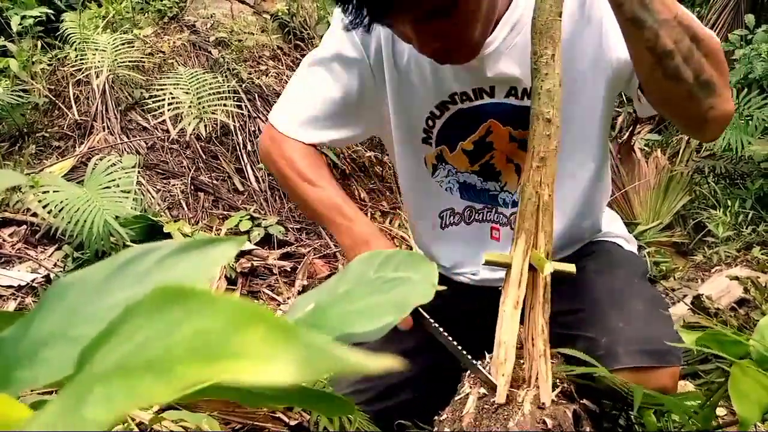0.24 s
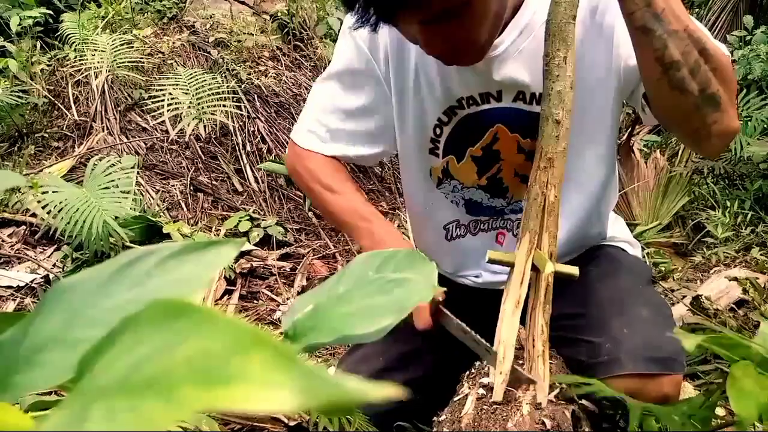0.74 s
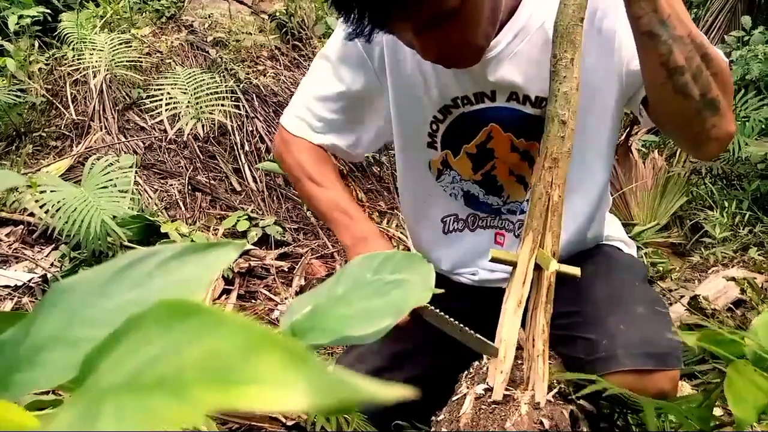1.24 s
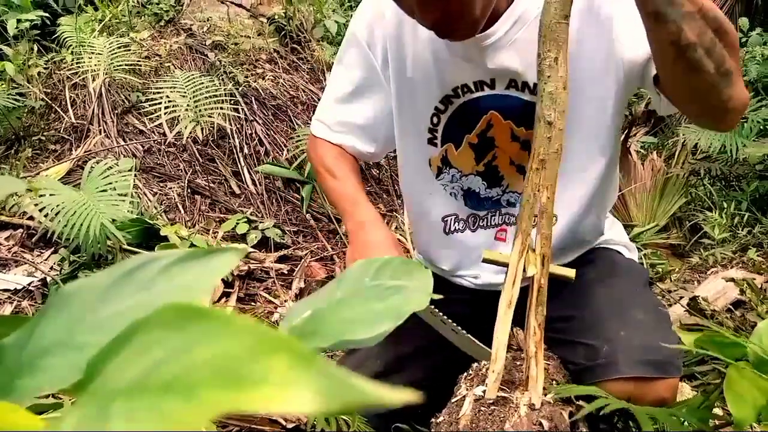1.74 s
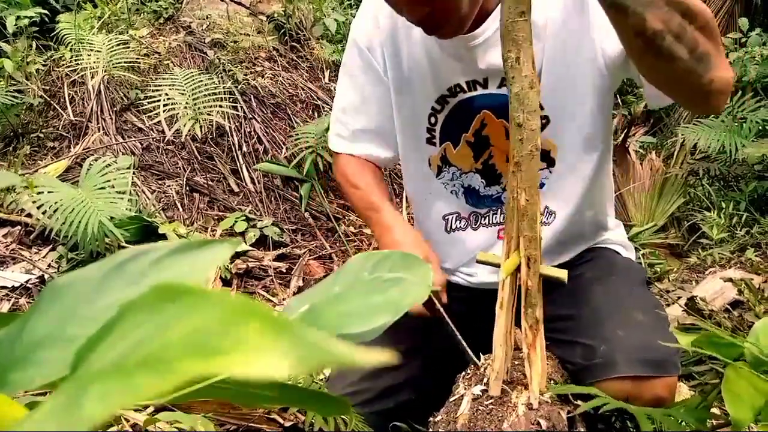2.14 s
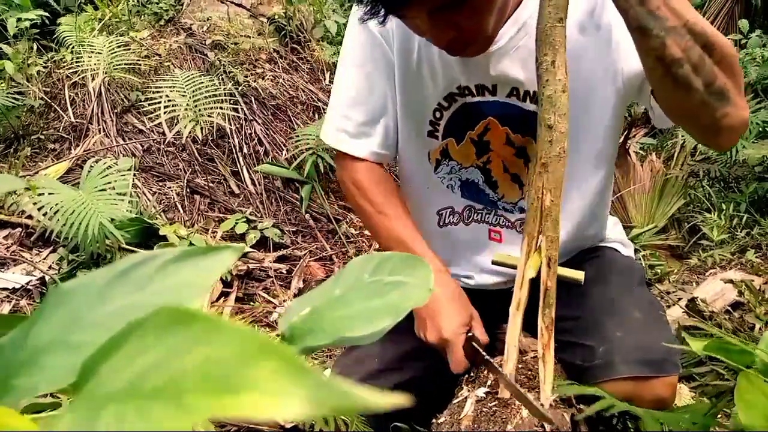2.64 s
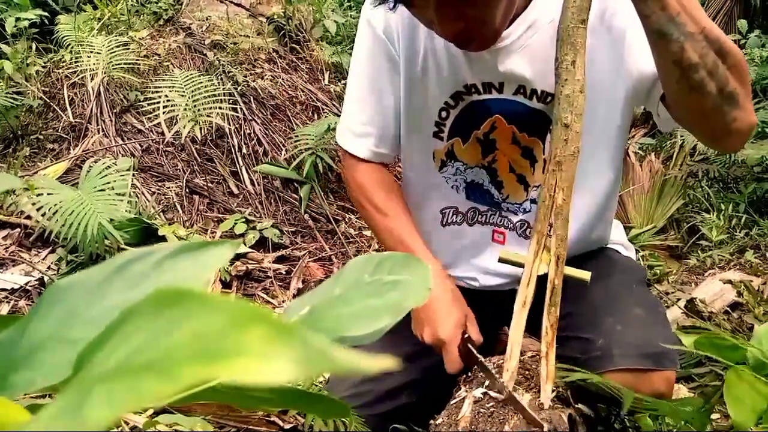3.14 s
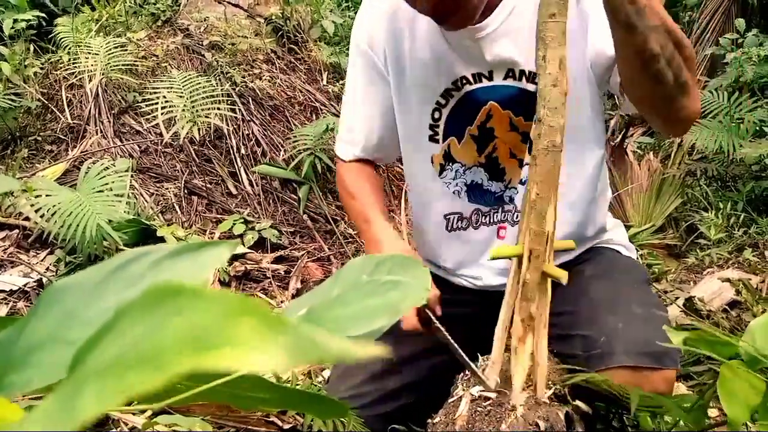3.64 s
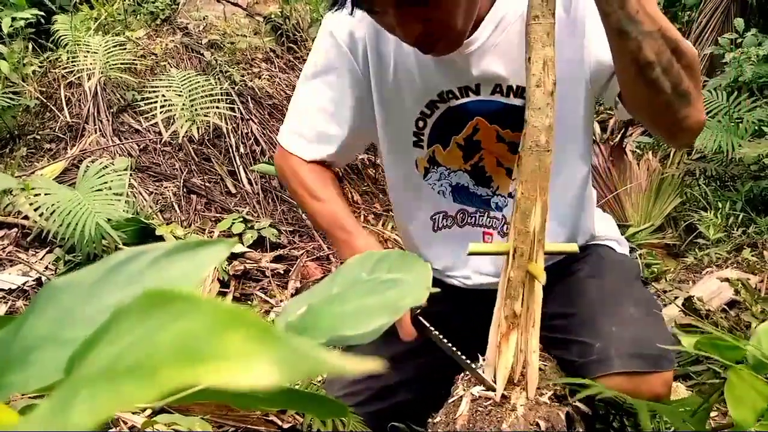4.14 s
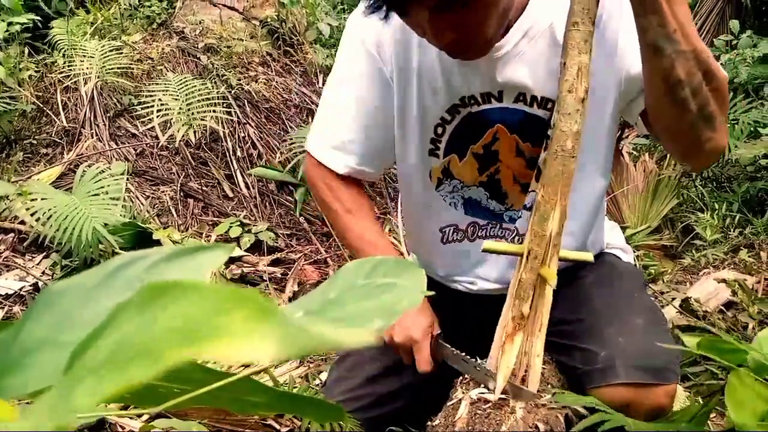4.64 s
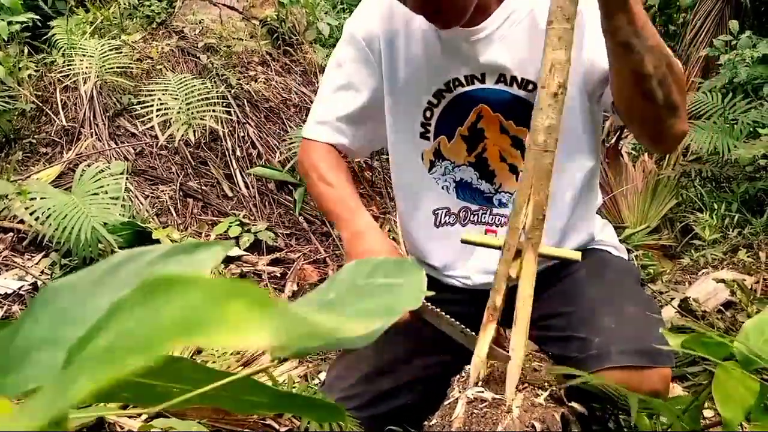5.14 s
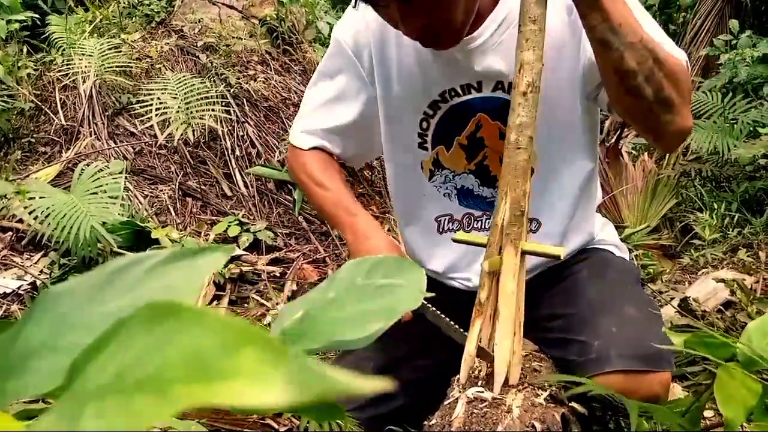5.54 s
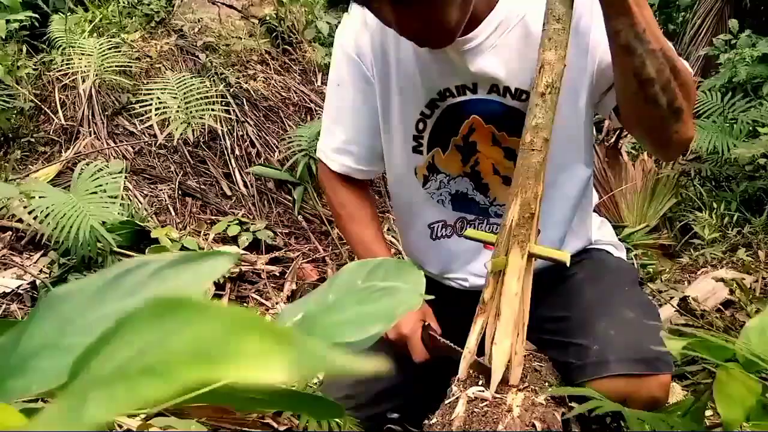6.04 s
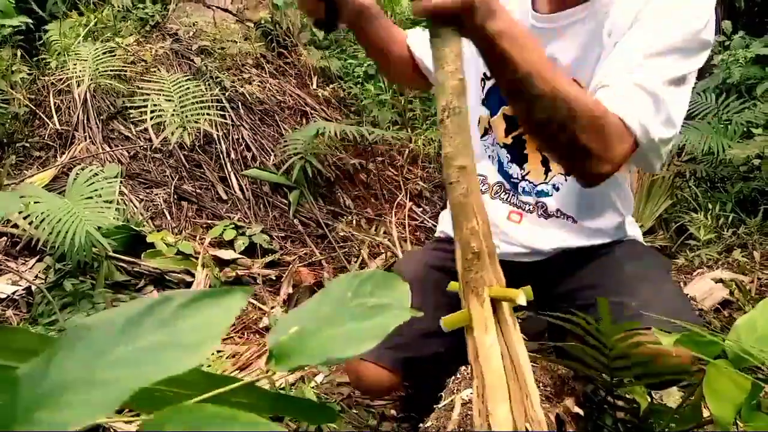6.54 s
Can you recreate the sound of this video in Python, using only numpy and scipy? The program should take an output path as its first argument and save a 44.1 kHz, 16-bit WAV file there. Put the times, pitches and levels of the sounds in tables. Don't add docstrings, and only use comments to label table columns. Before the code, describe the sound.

A close, dry mono outdoor scene with a very quiet bed: the faint bright hiss and dull wash of a distant stream, and a fuzzy low hum that swells and fades. A knife splits and whittles bamboo. A small hollow knock at 0.2 s leads to a crisp snap at 0.6, then a sharper crack with a high steel ring at 0.95. A hard double-edged crack with hollow pole knock comes at 1.35, a very bright dry snap at 1.93, a grazing cluster at 2.75 and a ringing crack with sliding steel at 3.15. From 3.5 to 4.6 only light ticks, gritty scrapes and litter rustle. Strong woody cracks return at 5.07 and, with blade ring, at 5.85. Small ticks and brushing follow near 6.35, while a low, lumpy wind gust buffets the microphone until about 6.8, with one last faint crack at 6.75.

```python
import sys
import numpy as np
from scipy import signal
from scipy.fft import rfft, irfft
from scipy.io import wavfile
from scipy.ndimage import uniform_filter1d

SR = 44100
rng = np.random.default_rng(int(sys.argv[2]) if len(sys.argv) > 2 else 0)


def natural_amplitude(level_db):
    exponent = np.asarray(level_db, float) / 20
    return 10 ** exponent


def generate_wav(sig):
    pcm = np.round(np.clip(np.atleast_2d(sig).T, -1, 1) * 32767).astype(np.int16)
    wavfile.write(sys.argv[1], SR, pcm)


N = 299439
TOP_HZ = 15650


def evened(x):
    return x / np.sqrt(np.mean(x ** 2) + 1e-20)


def curve(rows, rest_db):
    t = np.arange(0, N + 64, 64) / SR
    power = natural_amplitude(2 * rest_db) + 0 * t
    for peak_s, db, *lengths in rows:
        length = np.where(t < peak_s, lengths[0], lengths[-1])
        power = power + natural_amplitude(2 * (db - 10 * abs(t - peak_s) / length))
    return np.interp(np.arange(N) / SR, t, np.sqrt(power))


def read(points, hz):
    f, value = np.transpose(points)
    return np.interp(np.log(hz + 1), np.log(f + 1), value)


def add(mix, s, sound):
    part = mix[round(s * SR):][:len(sound)]
    part += sound[:len(part)]


def colour(x, db_of_hz):
    return irfft(rfft(x) * natural_amplitude(db_of_hz(np.fft.rfftfreq(len(x), 1 / SR))), len(x))


def band(x, lo_hz, hi_hz):
    return signal.sosfilt(signal.butter(2, [lo_hz, hi_hz], "bandpass", fs=SR, output="sos"), x)


def two_click_streams():
    noise = rng.standard_normal((2, N))
    strength = natural_amplitude(1.7 * rng.exponential(1, (2, N)))
    return noise * strength * (rng.random((2, N)) < .4)


# frequency in Hz, level in dB.
STREAM_HISS = [(710, -29), (1200, -4), (1410, -2), (1640, -3), (1880, -3), (2770, -4.5), (2980, -3.5),
               (3280, -4.5), (6510, -6), (8070, -13), (9990, -7.5), (13200, -26), (14900, -15),
               (15500, -14.5)]
# frequency in Hz, level in dB.
LOW_WASH = [(15, -63), (25, -30), (75, -15), (108, -18), (162, -6.5), (195, -2), (251, -4), (278, -7),
            (554, -11), (1400, -10.5), (1820, -44), (3080, -120)]


def stream():
    hiss = colour(rng.standard_normal(N),
                  lambda hz: read(STREAM_HISS, hz) - 80 * (hz > TOP_HZ) - 80 * (hz < 1300))
    wash = colour(rng.standard_normal(N), lambda hz: read(LOW_WASH, hz) - 80 * (hz >= 1300))
    water = natural_amplitude(-59.5) * evened(hiss) + natural_amplitude(-62.5) * evened(wash)
    z = signal.stft(water, nperseg=1024, noverlap=768)[2]
    patches = uniform_filter1d(rng.standard_normal(z.shape), size=8, axis=0)
    patches = uniform_filter1d(patches, size=12, axis=1)
    return signal.istft(z * natural_amplitude(1.7 * evened(patches)), nperseg=1024, noverlap=768)[1][:N]


# peak in seconds, level in dB, build-up in seconds, release in seconds.
SCRAPE_STROKES = [(.05, -66, .1, .06), (.62, -55, .045, .035), (1.2, -66, .25, .1), (1.4, -63, .12, 0.11),
                  (1.9, -68, .3, .1), (2.72, -57, .06, 0.085), (3.15, -58.5, 0.19, .12),
                  (3.6, -62.5, 0.157, .03), (4.12, -61, .05, .08), (4.53, -58.5, 0.096, .05),
                  (4.575, -54, 0.028, 0.027), (5.07, -60.5, 0.24, 0.127), (5.33, -62.5, .2, 0.54),
                  (5.84, -57, 0.12, .07), (6.02, -61, .12, 0.21), (6.37, -61.5, 0.11, .12),
                  (6.6, -63.5, .3, 0.44)]


def scrape(clicks):
    def shade(hz):
        return read(STREAM_HISS, hz) + 3.9 * np.log2(hz / 5000 + .05) - 80 * (hz > TOP_HZ)
    return curve(SCRAPE_STROKES, -73) * evened(colour(clicks, shade))


# frequency in Hz, level in dB, T60 in seconds.
HOLLOW_JOINTS = [(289, 5.2, 0.034), (422, 2.7, 0.033), (610, -10, 0.024), (850, 2, 0.031),
                 (1080, 2.8, 0.021), (1464, -1, 0.03), (2106, 0.5, 0.013), (2337, -4.5, 0.041),
                 (3590, -3.5, 0.037), (4110, -7, 0.026), (4930, -32, 0.016), (6320, -1, .022)]
# start in seconds, level in dB, centre in Hz, reach in octaves.
POLE_KNOCKS = [(.196, -50, 270, .3), (.620, -49.5, 420, .3), (.9442, -42.5, 520, 0.68),
               (0.9448, -45, 2600, 0.7), (1.338, -38.5, 380, 0.3), (1.3389, -38.5, 1050, 1.33),
               (1.9298, -32, 6000, 0.53), (2.737, -47.5, 330, 1.8), (2.742, -41, 2200, 0.67),
               (3.148, -42, 2400, .3), (4.115, -47, 357, .5), (4.570, -43, 610, .5), (4.589, -51, 420, .3),
               (5.065, -39.5, 1780, 0.55), (5.066, -31, 4110, .12), (5.849, -35.5, 400, 0.42),
               (5.850, -37.5, 2000, 0.75), (6.318, -45, 1400, .2), (6.343, -48, 1050, .2),
               (6.755, -46, 3590, .15)]


def knocks():
    out, t = np.zeros(N), np.arange(2048) / SR
    hz, joint_db, t60 = np.transpose(HOLLOW_JOINTS)[:, :, None]
    for s, db, centre_hz, reach in POLE_KNOCKS:
        level_db = db + joint_db - 10 * (np.log2(hz / centre_hz) / reach) ** 2
        onset = np.minimum(t * hz / 0.5, 1)
        rings = natural_amplitude(level_db - 60 * t / t60) * np.sin(2 * np.pi * hz * t) * onset
        add(out, s, rings.sum(0))
    return out


# peak in seconds, level in dB, length in seconds.
DRONE_SWELLS = [(.21, -58.5, 0.19), (.49, -61, 0.1), (.68, -62, 0.089), (.97, -54, 0.1),
                (1.21, -63.5, 0.063), (1.62, -58, 0.076), (1.85, -55.5, 0.11), (2.22, -66, .2),
                (2.68, -59, 0.19), (3.03, -73, 0.041), (3.21, -57, .15), (3.59, -63.5, .12),
                (3.8, -63.5, .1), (4.1, -65.5, 0.084), (4.43, -68, 0.044), (4.82, -59, 0.19),
                (5.02, -63, 0.23), (5.33, -61.5, 0.19), (5.51, -63.5, .12), (5.92, -59.5, 0.12),
                (6.36, -62, 0.25), (6.54, -67, 0.047), (6.68, -55.5, .06)]


def drone():
    return curve(DRONE_SWELLS, -73) * evened(band(rng.standard_normal(N), 189.6, 215.1))


# peak in seconds, level in dB, length in seconds.
WIND_BREATHS = [
    (.21, -74, 0.042),
    (.48, -70, 0.061),
    (2.75, -66, .25),
    (3.42, -67, .12),
    (3.79, -70, 0.053),
    (4.08, -64.5, 0.12),
    (4.6, -69, 0.096),
    (6.47, -59, 0.11),
    (6.67, -56, .1),
]


def wind():
    return curve(WIND_BREATHS, -73.5) * evened(band(rng.standard_normal(N), 85, 177))


# frequency in Hz, chance shift as a share,
# lift under pressure as a share, pitch ratio of the twin, level of the twin in dB.
BLADE_MODES = [(10320, .003, .003, 0.82, -16), (5610, .005, .024, 1.028, -8),
               (13100, .001, .001, 0.89, -12)]
# start in seconds, peak in dB,
# low mode and top mode in dB above the main one, T60 in seconds.
BLADE_STRIKES = [(.6108, -43, -30, -30, 0.025), (.8208, -49, -2.5, -30, .06),
                 (0.9452, -23.5, -19, -35, 0.052), (1.243, -52, 1, -20, .05), (1.310, -54.5, 17.5, -5, .03),
                 (1.3382, -22, -8, -24, 0.03), (1.3502, -31, -2, -25, .03), (1.3555, -36, -4, -11, .045),
                 (1.932, -41, -30, -30, 0.1), (2.7485, -43, 0, -14, .11), (2.762, -49, -3, 3, .06),
                 (2.7795, -54, -9, -15, .05), (3.1315, -55, 9, -9, .03), (3.1495, -20.5, -17, -22, 0.039),
                 (3.174, -30, -6, -19, .055), (3.5414, -64, 9, 7, .03), (5.8522, -23, -12.5, -28, .046),
                 (5.886, -56, 3, -12, .18)]
# start in seconds, peak in dB,
# low mode and top mode in dB above the main one, T60 in seconds.
BLADE_GRAZES = [
    (0.9602, -34, 3.5, -20, 0.032),
    (.9705, -48, -10, -20, .1),
    (1.362, -45, 5, -9, .04),
    (1.369, -48, -11, -9, .08),
    (2.7437, -16.5, -14, -28, .014),
    (3.1795, -25, -26, -23, 0.028),
    (3.190, -38.5, -9, -18, 0.071),
    (5.869, -35, -9, -18, 0.066),
]


def blade():
    out, t = np.zeros(N), np.arange(5000) / SR
    rows = [(*row, .00073, 0) for row in BLADE_STRIKES]
    rows += [(*row, .0038, 1) for row in BLADE_GRAZES]
    rows.sort()
    gaps = np.diff([row[0] for row in rows], append=N / SR)
    chances = rng.random((len(rows), len(BLADE_MODES), 3))
    for (s, db, low_db, top_db, t60, rise, pressed), gap, draws in zip(rows, gaps, chances):
        damping = np.clip((gap - t) / .004 + .8, 0, 1)
        shape = np.minimum(t / rise, 1) * damping
        for mode, lean_db, (a, b, c) in zip(BLADE_MODES, (0, low_db, top_db), draws):
            hz, shift, lift, ratio, twin_db = mode
            turns = hz * (1 + shift * (2 * c - 1) + lift * pressed) * t
            main = np.sin(2 * np.pi * (turns + a))
            twin = natural_amplitude(twin_db) * np.sin(2 * np.pi * (ratio * turns + b))
            add(out, s, shape * natural_amplitude(db + lean_db - 60 * t / t60) * (main + twin))
    return out


# frequency in Hz, level in dB.
CRACK_COLOUR = [(590, -54), (1000, -12.5), (2230, -9), (4010, -6), (4960, -5), (6200, -0.5), (8030, -11.5),
                (9810, -1), (11400, -10), (12600, -11.5), (13500, -10.5), (15400, -12), (16700, -33)]
# start in seconds, peak in dB, brightness in dB per octave, splinter pitch in Hz.
FIBRE_SNAPS = [(.6111, -37, 5, 10400), (0.6198, -27, 2.5, 8950), (0.9452, -36, -1.5, 2400),
               (0.9454, -26.5, 3.5, 8600), (.9475, -30, 4, 7400), (1.3393, -19, 6, 6240),
               (1.3425, -32, -2, 7050), (1.9296, -17.5, 6.5, 10900), (2.746, -33, 10, 9350),
               (2.7759, -36.5, 3, 8570), (3.146, -38, -3.9, 3030), (3.15, -28.5, 3.5, 5700),
               (3.168, -41, .5, 4690), (3.1742, -32, 4, 10340), (5.081, -37, 3, 6300),
               (5.067, -32, -3, 6600), (5.855, -33, 5, 9400), (5.8582, -31, 5, 9560), (6.756, -40, 0, 3620)]
# start in seconds, peak in dB, brightness in dB per octave, splinter pitch in Hz.
FIBRE_TEARS = [(.6173, -40, 0, 7000), (.961, -38, 4, 9650), (1.311, -41.5, -1.2, 7020),
               (1.344, -31, 6, 6330), (1.3513, -34, 4, 6420), (1.9306, -31, 5, 6300),
               (2.7362, -35.5, 0, 4240), (2.7384, -40, -2.6, 5120), (2.7438, -33.5, -3, 6700),
               (3.153, -29.5, 4, 10290), (3.183, -37, 1, 10380), (5.0651, -21.5, 7, 11280),
               (5.0791, -30, 4.5, 11370), (5.8497, -34.5, -6, 3120), (5.8525, -36, 4, 5900),
               (5.8537, -32, 11, 9560)]
# start in seconds, peak in dB, splinter pitch in Hz.
SPLINTER_TICKS = [(0.6245, -43, 3230), (.8044, -51, 9170), (.8205, -54, 3960), (.9895, -43.5, 6000),
                  (1.205, -45.5, 4870), (1.2434, -53, 3880), (1.3356, -40, 6330), (1.356, -42, 6500),
                  (1.3776, -54, 3920), (1.926, -47, 15200), (2.7493, -39, 3750), (2.7605, -43, 3830),
                  (2.996, -54, 6290), (3.0256, -48.5, 4820), (3.1985, -46, 10340), (3.5416, -50, 3880),
                  (3.614, -46.5, 4740), (4.535, -51, 6100), (4.569, -42.5, 4500), (4.5882, -42, 4310),
                  (4.7735, -42, 4610), (5.063, -41, 4390), (5.0975, -50, 3320), (5.843, -45, 15000),
                  (5.8686, -45, 6420), (6.1486, -46.5, 3570), (6.3443, -54, 4260), (6.3591, -49, 6290)]


def cracks():
    out, t = np.zeros(N), np.arange(2048) / SR
    lead = 128
    tail = natural_amplitude(-21 - 60 * t / .05)
    rows = [(*row, .009, .00038) for row in FIBRE_SNAPS]
    rows += [(*row, .021, .00038) for row in FIBRE_TEARS]
    rows += [(s, db, -3, hz, .014, .0015) for s, db, hz in SPLINTER_TICKS]
    grains = rng.standard_normal((len(rows), 2048))
    for (s, db, tilt_db, pitch_hz, t60, rise), grain in zip(rows, grains):
        def shade(hz):
            bright_db = tilt_db * np.log2(hz / 7000 + 0.045)
            splinter_db = 8 / (1 + ((hz - pitch_hz) / 450) ** 2)
            past_top_db = 1.8 * min(db + 21, 0) * (hz > TOP_HZ)
            return read(CRACK_COLOUR, hz) + bright_db + splinter_db + past_top_db
        fade = (natural_amplitude(-60 * t / t60) + tail) * np.minimum(t / rise, 1)
        tick = np.clip(db + 40, 0, 20) / 5 * (np.arange(2048) == 13)
        burst = colour(np.roll(grain * fade + tick, lead), shade)
        add(out, s - lead / SR, natural_amplitude(db + 3.5) * burst / abs(burst).max())
    return out


# peak in seconds, level in dB, build-up in seconds, release in seconds.
LITTER_BRUSHES = [
    (3.6, -64.5, .16, 0.19),
    (4.12, -67.5, .3, 0.57),
    (4.575, -63, .05, .03),
    (5.6, -64.5, 1.3, .9),
    (6.33, -62, .12, .12),
    (6.6, -73, .3, .6),
]


def rustle(clicks):
    return curve(LITTER_BRUSHES, -88) * evened(band(clicks, 310, 1960))


# centre in seconds, peak in dB, frequency in Hz, length in turns.
GUST_LUMPS = [(6.39, -50, 90, 2.1), (6.449, -42, 74.5, 2.8), (6.492, -41, 84, 2.9), (6.516, -47, 110, 2.3),
              (6.552, -49, 192, 2.4), (6.60, -49.5, 80, 3.1), (6.625, -48, 90, 2.4), (6.653, -40, 123, 5.2),
              (6.693, -44, 74.6, 2.4), (6.714, -40.5, 145, 2.2), (6.79, -48, 60, 3.3)]


def gust():
    out = np.zeros(N)
    for s, db, hz, turns in GUST_LUMPS:
        u = np.arange(-turns / 2, turns / 2, hz / SR)
        add(out, s - turns / 2 / hz, natural_amplitude(db) * np.cos(2 * np.pi * u) * np.hanning(len(u)))
    return out


def scene():
    air = stream() + drone() + wind() + gust()
    fibre_clicks, litter_clicks = two_click_streams()
    rubbing = scrape(fibre_clicks) + rustle(litter_clicks)
    mono = air + rubbing + cracks() + knocks() + blade()
    return np.array([mono, mono])


def low_pass(x):
    return signal.sosfilt(signal.butter(12, 16820, fs=SR, output="sos"), x)


def record(dry):
    cut = signal.sosfilt(signal.butter(2, 42, "highpass", fs=SR, output="sos"), dry)
    return low_pass(cut)


dry = scene()
out = record(dry)
generate_wav(out)
```